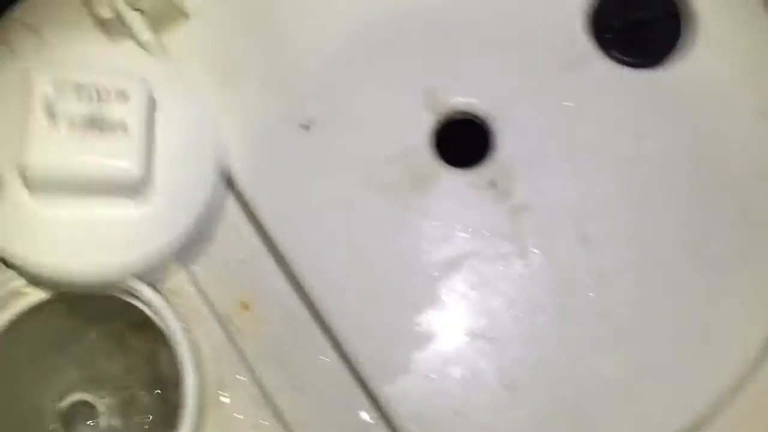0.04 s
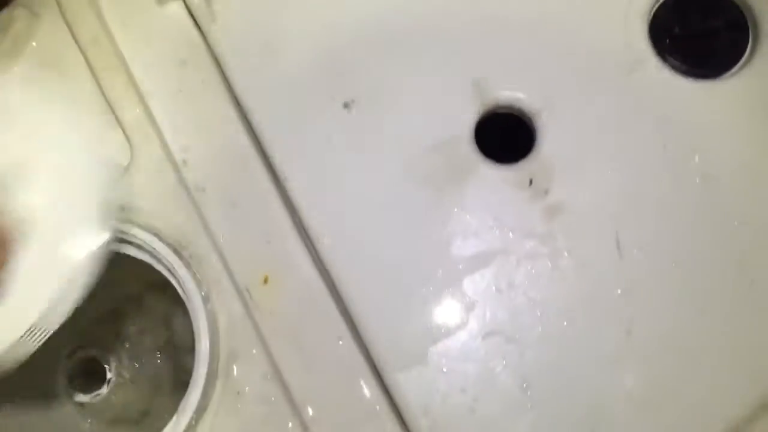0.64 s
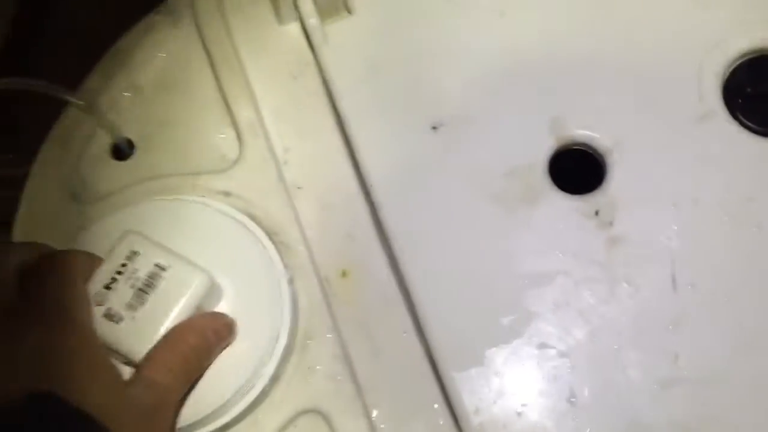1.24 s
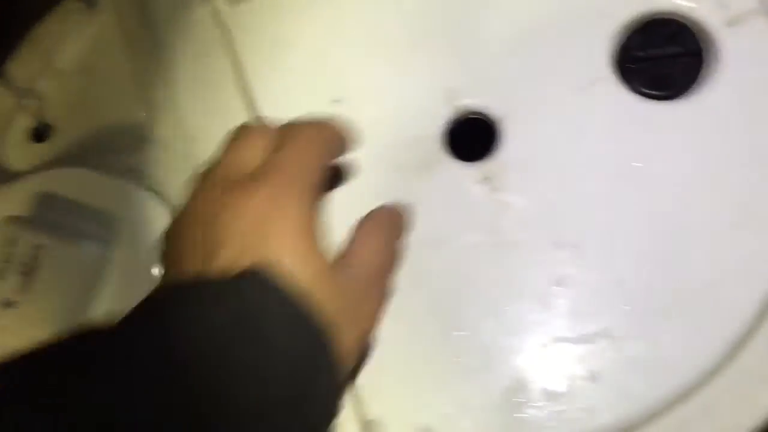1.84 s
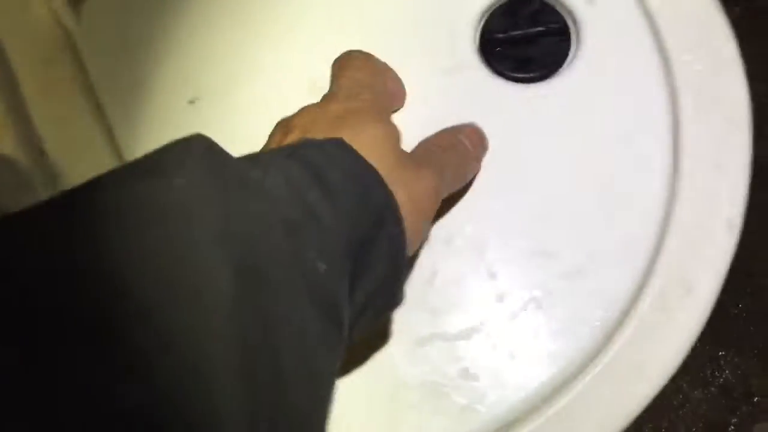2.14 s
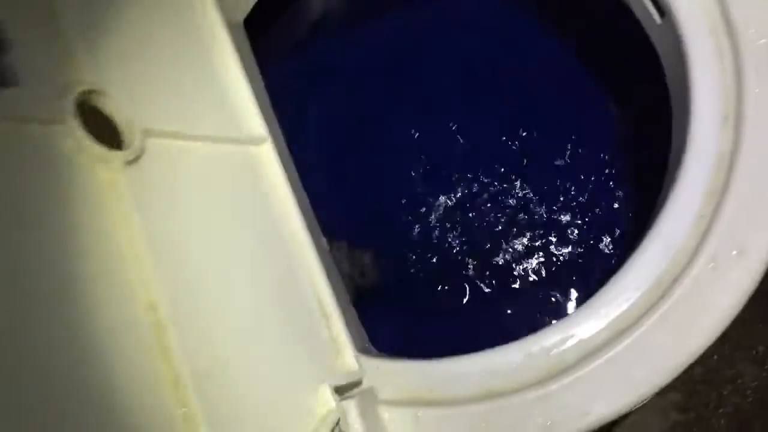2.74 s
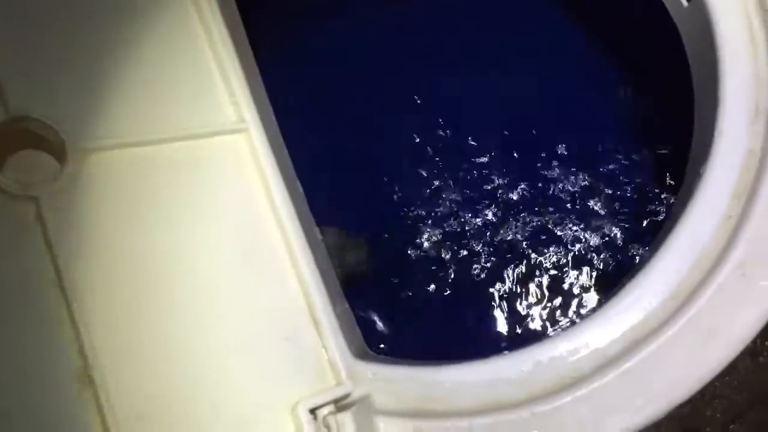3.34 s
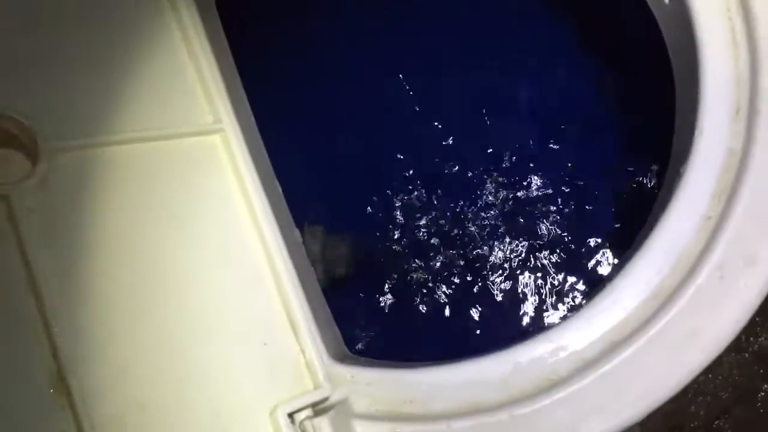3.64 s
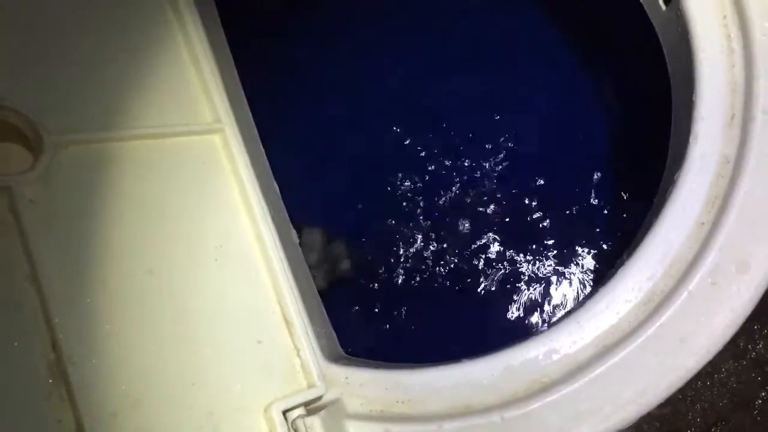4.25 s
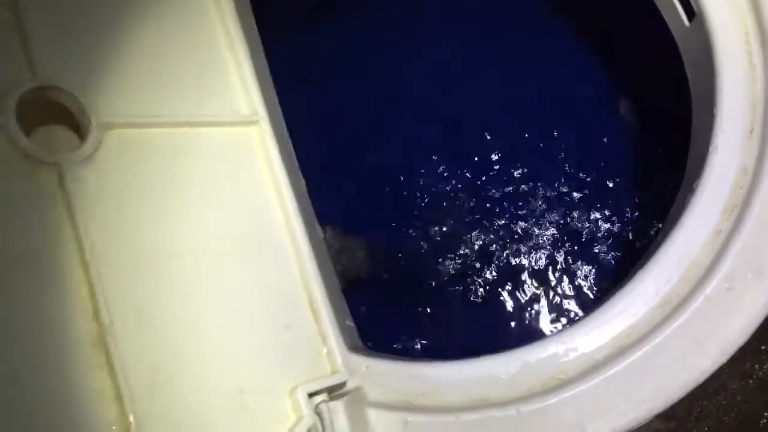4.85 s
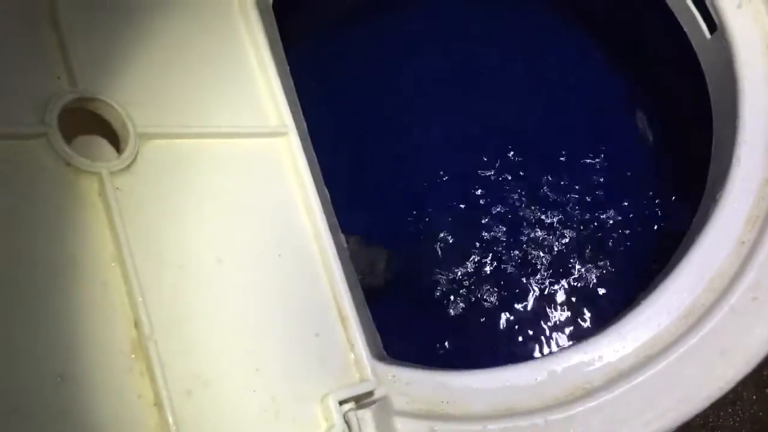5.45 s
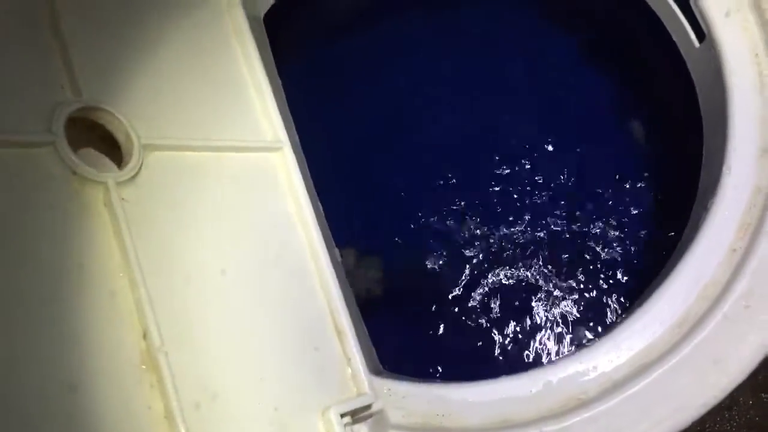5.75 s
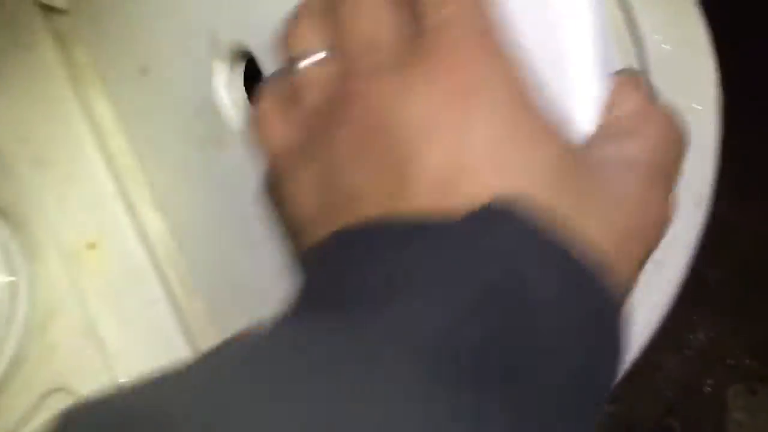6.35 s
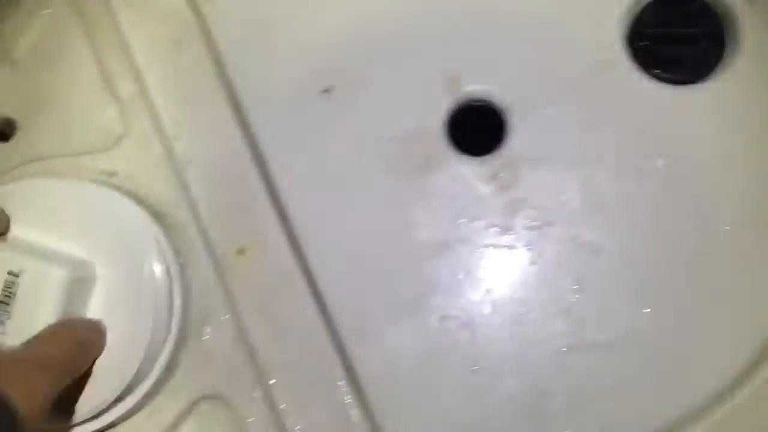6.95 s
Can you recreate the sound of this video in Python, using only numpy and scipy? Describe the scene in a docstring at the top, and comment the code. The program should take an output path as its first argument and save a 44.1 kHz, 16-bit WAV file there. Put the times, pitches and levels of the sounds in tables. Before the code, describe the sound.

Within arm's length of the microphone, water churns softly inside a plastic tank over a faint low hum. A cap is dragged with a chattering scrape, dropped into place and tightened. The lid lifts with hollow thumps and a hinge clack, letting out bubbling, small sloshes and tiny pings, while a sleeve rustles. Finally the plastic lid slams down, the loudest sound, followed by a few light bumps.

```python
"""A plastic bait tank on a deck, one microphone within arm's length. From the start the pump hums and the
inflow churns the water, which booms in the air space under the lid. A hand drags a screw cap over the
deck, drops it in its port at 1 s and screws it down. At 2.3 s the hinged lid is pried up and the water
comes through louder. A jacket sleeve swishes as the arm moves, bubbles gurgle and ping in the open
tank, and at 6.7 s the lid slams."""
import sys
import numpy as np
from scipy import signal
from scipy.fft import rfft, irfft, next_fast_len
from scipy.io import wavfile

SR = 44100
rng = np.random.default_rng(int(sys.argv[2]) if len(sys.argv) > 2 else 0)


def output_pcm(signal):
    """Save a mono or channel-first signal as 16-bit PCM at the path in sys.argv[1].

    Samples are clipped to [-1, 1] before scaling.
    """
    pcm = np.clip(np.atleast_2d(signal).T, -1, 1) * 32767
    wavfile.write(sys.argv[1], SR, np.round(pcm).astype(np.int16))


N = 318093
TIME = np.arange(N) / SR
AGE = TIME[:SR // 2]   # seconds since the onset of a short sound


def from_db(db):
    """Decibels to gain."""
    return np.exp(np.log(10) * np.asarray(db) / 20)


def rms_one(x):
    """Scale to unit rms."""
    return x / np.sqrt(np.mean(x ** 2) + 1e-20)


def colour(x, spectrum):
    """Give a steady sound a spectrum that falls away steeply past its ends; rms 1."""
    hz, db = np.transpose(spectrum)
    freqs = np.maximum(np.fft.rfftfreq(len(x), 1 / SR), 1)
    skirts = np.minimum(1, np.minimum(freqs / hz[0], hz[-1] / freqs)) ** 4
    shape = from_db(np.interp(np.log(freqs), np.log(hz), db))
    return rms_one(irfft(rfft(x) * skirts * shape, len(x)))


def noise(spectrum, size=N):
    """Coloured noise, rms 1."""
    return colour(rng.standard_normal(next_fast_len(size)), spectrum)[:size]


def drift(rate_hz):
    """A random wander about zero, roughly one unit wide."""
    knots = rng.standard_normal(2000)
    return np.interp(TIME * rate_hz, np.arange(len(knots)), knots)


def add(track, s, sound):
    """Mix a sound in at time s."""
    start = max(0, int(s * SR))
    track[start:start + len(sound)] += sound[:N - start]


def fade(t60):
    """Exponential decay, 60 dB down after t60 seconds."""
    return np.exp(-np.log(1000) * np.minimum(AGE / t60, 10))


def swell(s, half_length_s):
    """A smooth rise and fall about time s."""
    return np.exp(-np.minimum(((TIME - s) / half_length_s) ** 2, 20))


def stroke(s, length_s, attack_s, release_s):
    """A rubbing movement swells, holds to the end of its length and dies away."""
    return np.clip((TIME - s) / attack_s, 0, 1) * np.exp(-np.clip(TIME - s - length_s, 0, 1) / release_s)


def ring(modes, spread_db, build_cycles):
    """Struck modes, each with a strength of its own; the low ones take longest to build up."""
    hz, db, t60 = np.transpose(modes)[:, :, None]
    strength = from_db(db + spread_db * rng.standard_normal(hz.shape)) * rng.choice([-1, 1], hz.shape)
    build = 1 - np.exp(-AGE * hz / build_cycles)
    return np.sum(strength * build * fade(t60) * np.sin(2 * np.pi * hz * AGE), axis=0)


def crack(spectrum, t60, tail_db, tail_t60):
    """Countless short modes, with a tail from the hollow of the tank."""
    return noise(spectrum, size=len(AGE)) * (fade(t60) + from_db(tail_db) * fade(tail_t60))


def contact(sound, peaks_db):
    """Place and hardness of a contact decide how high its lows, middles and highs peak."""
    bands = [(700, "low"), ([700, 2200], "band"), (2200, "high")]
    parts = [signal.sosfilt(signal.butter(4, hz, kind, fs=SR, output="sos"), sound) for hz, kind in bands]
    return sum(from_db(db) * part / np.abs(part).max() for db, part in zip(peaks_db, parts))


def bubbles(per_s, low_hz, high_hz, cycles, size_db, rise, size=N):
    """Bubbles ring for some cycles each and rise in pitch as they near the surface."""
    out = np.zeros(next_fast_len(N))
    for when, pitch, strength in rng.random((int(per_s * size / SR), 3)):
        hz = low_hz * (high_hz / low_hz) ** pitch
        life = cycles / hz
        t = AGE[:int(life * SR)]
        chirp = np.sin(2 * np.pi * hz * t * (1 + rise * t / life)) * np.minimum(hz * t / 2, 1)
        gain = from_db(size_db * min(-np.log(1 - strength), 4))
        add(out[:N], when * TIME[size - 1], gain * chirp * np.exp(-np.log(1000) * t / life))
    return rms_one(out)


# tones of the pump: pitch_hz, level_db
PUMP_TONES = [(118.4, -63), (382.2, -53), (759.0, -69), (1141, -67.5)]
# spectrum of pump and pipes: freq_hz, density_db
PIPE_RUMBLE = [(30, -20), (50, -3), (90, 0.5), (130, -6), (170, -10.5)]
def pump():
    """Far down in the background the pump hums, wavering with its load, over a rumble in the pipes."""
    running_s = np.cumsum(1 + .009 * drift(15)) / SR
    hum = sum(from_db(db + 1.5 * drift(21)) * np.sin(2 * np.pi * hz * running_s) for hz, db in PUMP_TONES)
    return hum + from_db(-61) * noise(PIPE_RUMBLE)


# the lid's opening: time_s, open_share
LID_OPENING = [(2.29, 0), (2.52, 1), (6.22, 1), (6.75, 1)]
def lid_open():
    """Rises from 0 to 1 as the lid is lifted and stays there to the end."""
    return np.clip(np.interp(TIME, *np.transpose(LID_OPENING)), 0, 1)


def escaping(shut_db, port_db, lid_db, port_closed_s=1.3):
    """Gain from inside the tank to the microphone; the open port and the lifted lid each add to it."""
    return from_db(shut_db + port_db * (TIME < port_closed_s) + lid_db * lid_open())


# spectra of the churning water and of its fizz: freq_hz, density_db
CHURN_SPECTRUM = [(290, 9.5), (380, 7.5), (480, 1.5), (1000, -13.5), (1350, -14.5), (1900, -18),
                  (3000, -43.5)]
FIZZ_SPECTRUM = [(2200, 1), (3100, -0.5), (4100, -1), (5700, -4.5), (8000, -6.5), (11000, -11),
                 (16000, -12.5)]
AIR_HZ, AIR_T60_S = 231.7, 0.08
def water():
    """The steady inflow stirs up bubbles and fizz, and keeps the air above the water booming."""
    air_mode = fade(AIR_T60_S) * np.cos(2 * np.pi * AIR_HZ * AGE)
    air = signal.fftconvolve(rng.standard_normal(N), air_mode)[:next_fast_len(N)]
    boom = colour(air, [(165, -14.5), (200, 7), (255, -4), (300, -20)])[:N]
    large = bubbles(per_s=520, low_hz=672, high_hz=2315, cycles=51, size_db=4, rise=0.037)
    churn = from_db(-5.5) * colour(large, CHURN_SPECTRUM)[:N]
    churn += from_db(2) * noise(CHURN_SPECTRUM) * from_db(3 * drift(19))
    # under the jet, bubbles come in clusters whose size, and so pitch, wanders
    cloud = bubbles(per_s=170, low_hz=1000, high_hz=1450, cycles=135, size_db=3, rise=0.053)
    position = np.cumsum(np.exp(.055 * drift(9))) % N
    gurgle = np.interp(position, np.arange(len(cloud)), cloud) * from_db(3 * drift(13))
    droplets = bubbles(per_s=170, low_hz=3500, high_hz=7000, cycles=120, size_db=2, rise=.035)[:N]
    droplets *= from_db(2.2 * drift(9))
    # gurgle and droplets reach the microphone through the open hatch
    babble = churn + (0.08 + 0.26 * lid_open()) * gurgle
    spray = from_db(-5.5) * lid_open() * droplets + noise(FIZZ_SPECTRUM) * from_db(drift(26))
    return (escaping(shut_db=-63.5, port_db=3, lid_db=12) * boom
            + escaping(shut_db=-59.5, port_db=3, lid_db=2.5) * babble
            + escaping(shut_db=-68.5, port_db=3.5, lid_db=0.5) * spray)


# waves slopping at the tank wall: middle_s, half_length_s, level_db, centre_hz
WAVES = [(3.758, 0.038, -62, 1790), (5.264, 0.13, -62, 1820), (5.486, 0.041, -61.5, 2060),
         (6.129, 0.022, -55.5, 1990)]
def sloshes():
    """Each small wave swells and falls with a burst of froth."""
    waves = sum(from_db(db) * swell(s, half) * noise([(hz / 2, -12), (hz, 0), (hz * 2, -15)])
                for s, half, db, hz in WAVES)
    return waves * from_db(2.9 * drift(70))


# clusters of large bubbles: middle_s, level_db, pitch_hz
CLUSTERS = [(3.745, -53.5, 1226), (3.83, -56.5, 1323), (4.3, -58, 860), (4.546, -55.5, 1316),
            (4.809, -60.5, 1500), (5.159, -58.5, 1200), (5.459, -60, 1330), (5.72, -59.5, 1237),
            (5.962, -61, 1470), (6.19, -52.5, 1200)]
def gurgles(half_length_s=0.052, pitch_ratio=0.99):
    """A cluster of like-sized bubbles swells up and dies away."""
    out = np.zeros(N)
    envelope = np.exp(-((AGE - AGE.mean()) / half_length_s) ** 2)
    for s, db, hz in CLUSTERS:
        cloud = bubbles(per_s=120, low_hz=hz * pitch_ratio, high_hz=hz / pitch_ratio,
                        cycles=144, size_db=4, rise=0.09, size=len(AGE))
        cluster = rms_one(envelope * cloud[:len(AGE)]) / rms_one(envelope).max()
        add(out, s - AGE.mean(), from_db(db) * cluster)
    return out


# the loudest tiny bubbles: start_s, level_db, pitch_hz
BURSTS = [(1.142, -45, 9640), (2.771, -46, 9200), (3.73, -49.5, 9900), (3.7476, -47, 5270),
          (4.194, -43, 11300), (4.4767, -51.5, 3970), (4.785, -52, 13800), (4.93, -52, 5350),
          (5.3354, -47.5, 9130), (6.166, -41, 12000)]
def pings(ring_cycles=180):
    """Single tiny bubbles burst and ring; the smaller, the higher and shorter."""
    out = np.zeros(N)
    for s, db, hz in BURSTS:
        note = np.sin(2 * np.pi * hz * AGE * (1 + 0.6 * AGE)) * fade(ring_cycles / hz)
        spatter = crack([(hz * 1.35, -6), (hz, 0), (hz * 0.91, -6)], 0.015, tail_db=-11, tail_t60=0.12)
        add(out, s, from_db(db) * (note + 0.45 * spatter) * (1 - fade(0.0016)))
    return out


# arm movements: middle_s, half_length_s, swish_db, sheen_db
ARM_MOVES = [(1.6, 0.075, -54, -62.5), (2.613, 0.14, -55, -67), (2.97, 0.15, -59, -66.5),
             (3.174, 0.087, -53, -53), (3.299, 0.029, -56, -56), (3.416, 0.13, -52.5, -55),
             (5.012, 0.075, -60.5, -67.5), (6.357, .14, -53, -61)]
# the sleeve pressing along the jacket: start_s, length_s, level_db
SLEEVE_PRESSES = [(3.267, 0.032, -34), (3.402, 0.11, -47.5)]
# spectra of the sleeve's swish, its sheen, pressed cloth and skin on plastic: freq_hz, density_db
SWISH_SPECTRUM = [(500, 6.5), (1350, 4.5), (2050, 0.5), (2900, -1.5), (3850, -0.5), (4900, -4), (7200, -5),
                  (9000, -38)]
SHEEN_SPECTRUM = [(7800, -4), (9150, 4), (10300, -7), (11000, -1.5), (15500, -6.5)]
CLOTH_SPECTRUM = [(50, -12), (120, -4.5), (350, 2), (490, -5), (690, 4.5), (850, -10.5), (1300, -18.5),
                  (2100, -21.5)]
SKIN_SPECTRUM = [(900, -22), (1500, 8.5), (2600, 2), (4400, 2), (5000, -9), (6000, -4), (9500, -16),
                 (15000, -30)]
def arm(gap_hz=1990, gap_share=0.22):
    """Close to the microphone, fabric swishes in grainy swells and the hand slides off the cap."""
    swish, sheen = sum(from_db([[swish_db], [sheen_db]]) * swell(s, half)
                       for s, half, swish_db, sheen_db in ARM_MOVES)
    press = sum(from_db(db) * stroke(s, length, attack_s=0.018, release_s=0.11)
                for s, length, db in SLEEVE_PRESSES)
    slide = from_db(-41) * stroke(1.664, length_s=0.11, attack_s=0.087, release_s=0.048)
    hiss = swish * noise(SWISH_SPECTRUM) + sheen * noise(SHEEN_SPECTRUM)
    hiss += press * noise(CLOTH_SPECTRUM) * from_db(2 * drift(60))
    # a narrow gap under the arm rings at multiples of gap_hz
    hollow = sum(gap_share ** k * np.interp(TIME - k / gap_hz, TIME, hiss) for k in range(3))
    rub = hollow * from_db(2 * drift(45) + 0.78 * drift(250)) + slide * noise(SKIN_SPECTRUM)
    deck_reflection = .25 * np.interp(TIME - .00087, TIME, rub)
    return rub + deck_reflection


# modes of the deck: pitch_hz, level_db, t60_s
DECK_MODES = [(143, -1.5, .085), (219.5, 5, 0.074), (362, -2.5, 0.1), (548, -4.5, 0.068), (996, 4.5, 0.044),
              (1130, 4, 0.033), (1376, -8.5, 0.019), (1760, -18.5, 0.068), (2464, -16, 0.065),
              (2690, -14.5, 0.036)]
def deck_modes(wander=0.021):
    """The deck's pitches shift a little with the place of contact."""
    return [(hz * np.exp(wander * rng.standard_normal()), db, t60) for hz, db, t60 in DECK_MODES]


# crack of the deck's plastic: freq_hz, density_db
DECK_SPECTRUM = [(100, 12), (1100, 0), (2600, -12), (3600, -20.5), (5600, -21.5), (10000, -35.5),
                 (16000, -93)]
# soft blows on the tank: start_s, pitch_hz, t60_s, boom_db, scuff_db
NUDGES = [(1.098, 319, 0.082, -28, -33), (1.188, 220, 0.043, -25.5, -51), (1.25, 304, .09, -35, -40),
          (1.382, 283, 0.051, -25, -37), (1.583, 215, 0.07, -31, -42.5), (2.381, 233, 0.08, -21, -41),
          (2.442, 227, 0.13, -26, -53), (2.498, 242.4, .15, -25, -45.5), (2.561, 245, 0.12, -31.5, -61),
          (2.672, 239, 0.081, -25.5, -35), (2.811, 250, 0.11, -35, -52), (4.112, 232, 0.078, -28.5, -52),
          (6.357, 238, 0.059, -24.5, -70), (6.464, 242, 0.093, -21, -43), (6.509, 223, 0.079, -14, -34),
          (6.686, 212, .12, -23, -53), (6.976, 212, 0.046, -26, -48), (7.029, 296, 0.099, -36, -50),
          (7.117, 193, 0.054, -37.5, -46)]
def bumps(rattle_share=0.083):
    """Fingers, cap and lid nudge the tank: a rough boom, pitched by place and opening, and a scuff."""
    out = np.zeros(N)
    for s, hz, t60, boom_db, scuff_db in NUDGES:
        modes = [(hz, 0, t60), (hz * .62, -15, .06), (hz * 1.35, -11, .05)]
        boom = ring(modes, spread_db=0.96, build_cycles=3) * (1 - np.exp(-AGE / 0.0035))
        scuff = crack(DECK_SPECTRUM, t60=.035, tail_db=-14, tail_t60=.14)
        scuff += .3 * ring(deck_modes()[3:], spread_db=2, build_cycles=1)
        blow = boom + rattle_share * scuff * (1 - fade(.02))
        add(out, s, contact(blow, [boom_db, scuff_db, scuff_db - 20]))
    return out


# pushes that drag the cap: start_s, length_s, level_db
CAP_PUSHES = [(0.012, 0.12, -35.5), (0.133, 0.063, -24), (0.188, 0.082, -39), (0.302, 0.1, -30.5),
              (0.553, 0.027, -37)]
# its rim catching on the deck: start_s, low_db, middle_db, high_db
RIM_CATCHES = [(.022, -26, -30, -50), (.038, -22.5, -19.5, -45), (.059, -20, -29, -47),
               (.111, -26.5, -32, -35.5), (.13, -6, -10.5, -14), (.151, -10, -17, -15.5),
               (.17, -14.5, -5.5, -19.5), (0.212, -24, -14.5, -48), (.226, -25, -18.5, -46),
               (.242, -22, -17.5, -33), (.293, -18.5, -15, -15), (.326, -20, -13.5, -38),
               (.353, -19.5, -16.5, -19), (.389, -17.5, -25, -43), (.502, -30.5, -34.5, -49),
               (.523, -29.5, -22.5, -58), (.57, -22.5, -22, -54)]
def cap_drag(slips_per_s=420, slip_spread_db=2, spots=4):
    """The cap chatters over the deck in small slips and catches now and then with a short tick."""
    chatter = np.zeros(N)
    for _ in range(spots):
        slipping = rng.random(SR) < slips_per_s / spots / SR
        slips = slipping * from_db(slip_spread_db * rng.standard_normal(SR)) * rng.choice([-1, 1], SR)
        tick = ring(deck_modes(), spread_db=2, build_cycles=.3)
        tick += .25 * crack(DECK_SPECTRUM, t60=.012, tail_db=-14, tail_t60=.08)
        add(chatter, 0, signal.fftconvolve(slips, tick))
    effort = sum(from_db(db) * stroke(s, length, attack_s=0.012, release_s=0.027)
                 for s, length, db in CAP_PUSHES)
    out = effort * chatter / chatter[:SR].std()
    for s, *peaks_db in RIM_CATCHES:
        knock = ring(deck_modes(), spread_db=3.3, build_cycles=0.23)
        snap = crack(DECK_SPECTRUM, t60=0.017, tail_db=-9.5, tail_t60=0.16)
        add(out, s, contact(knock + 1.4 * snap, peaks_db))
    # the drag keeps out of the deep bass and the top treble
    return signal.sosfilt(signal.butter(2, [90, 10000], "band", fs=SR, output="sos"), out + 1e-18)


# modes of the cap: pitch_hz, level_db, t60_s
CAP_MODES = [(344, 1, 0.13), (385, 8, 0.19), (448, 3, 0.14), (1253, 9.5, 0.09), (1430, 8.5, 0.039),
             (1660, 4, 0.069), (2400, -2.5, 0.12), (2650, -10, 0.14), (2840, -5, 0.055), (4660, 3.5, 0.012)]
# crack of the cap's plastic: freq_hz, density_db
CAP_SPECTRUM = [(150, -19), (350, 13.5), (800, -6), (1400, 4.5), (2700, -7), (3600, -6.5), (4800, -10),
                (7500, -17.5), (16000, -30)]
# the cap landing in its port: start_s, low_db, middle_db, high_db
CAP_BOUNCES = [(1.023, -19, -10, -10.5), (1.029, -24, -33, -18), (1.056, -22, -25.5, -40)]
def cap_taps():
    """The cap clacks into its port and bounces, damped by the hand that holds it."""
    out = np.zeros(N)
    for s, *peaks_db in CAP_BOUNCES:
        snap = crack(CAP_SPECTRUM, t60=0.025, tail_db=-14.5, tail_t60=0.28)
        body = ring(CAP_MODES, spread_db=0.69, build_cycles=0.42) * fade(t60=0.37)
        add(out, s, contact(body + 1.35 * snap, peaks_db))
    return out


def cap_turn(port_hz=305):
    """Screwed down, the cap rubs unevenly on its seat and its thread grates once."""
    seat = noise([(port_hz * 0.45, -8), (port_hz, 0), (port_hz * 1.08, -7),
                  (port_hz * 2, -23), (port_hz * 6, -35)])
    turn = from_db(-47.5 + 5.1 * drift(28.98)) * stroke(1.023, 0.6, attack_s=.03, release_s=0.026)
    grate = from_db(-37.5) * stroke(1.461, length_s=0.0059, attack_s=0.0048, release_s=0.013)
    return turn * seat + grate * noise(CAP_SPECTRUM)


# clicks of the cap's thread: start_s, level_db
CLICKS = [(.502, -32.5), (1.188, -50.5), (1.384, -57)]
# their spectrum: freq_hz, density_db
THREAD_SPECTRUM = [(4450, 2.5), (5200, -1.5), (9000, -9.5), (13000, -30)]
def thread_clicks():
    """The cap's thin thread gives small, bright, dry clicks."""
    out = np.zeros(N)
    for s, db in CLICKS:
        add(out, s, from_db(db) * crack(THREAD_SPECTRUM, t60=0.015, tail_db=-20, tail_t60=0.17))
    return out


# jerks of the lid: start_s, low_db, high_db
LID_JERKS = [(2.268, -22, -56), (2.296, -26, -37.5), (2.327, -26.5, -55), (2.343, -32, -54)]
def lid_pry():
    """The lid's edge rubs and jerks out of its seat."""
    pull = from_db(-43.5) * stroke(2.26, length_s=0.11, attack_s=0.038, release_s=0.068)
    out = pull * noise(DECK_SPECTRUM) * from_db(2 * drift(150))
    for s, low_db, high_db in LID_JERKS:
        thud = ring(DECK_MODES[:2], spread_db=1.2, build_cycles=0.39)
        snap = crack(DECK_SPECTRUM, t60=0.031, tail_db=-9, tail_t60=0.071) * (1 - fade(0.0065))
        add(out, s, contact(thud + 0.39 * snap, [low_db, low_db - 15.5, high_db]))
    return out


# modes of the hinge: pitch_hz, level_db, t60_s
HINGE_MODES = [(694, -1, 0.043), (932, -4, 0.14), (1070, 0.5, 0.056), (1387, 8, 0.027), (1965, -12, 0.076),
               (3820, -3, 0.033)]
# knocks of hinge and stop: start_s, low_db, middle_db, high_db
HINGE_KNOCKS = [(2.653, -38, -23.5, -33.5), (2.664, -32, -30.5, -51)]
def hinge():
    """The hinge clacks, then the lid lands on its stop."""
    out = np.zeros(N)
    for s, *peaks_db in HINGE_KNOCKS:
        body = ring(HINGE_MODES, spread_db=0.91, build_cycles=0.95)
        snap = crack(CAP_SPECTRUM, t60=0.053, tail_db=-13, tail_t60=0.15)
        add(out, s, contact(body + 1.05 * snap, peaks_db))
    return out


def lid_settle(open_tank_hz=243):
    """Just after landing on its stop, the lid shudders and the tank's air booms briefly."""
    boom = noise([(open_tank_hz * 0.73, -12), (open_tank_hz, 0), (open_tank_hz * 1.6, -12)])
    return from_db(-39) * stroke(2.7, length_s=0.084, attack_s=0.018, release_s=0.026) * boom


# modes of the lid: pitch_hz, level_db, t60_s
LID_MODES = [(74, 3, .07), (130, 11.5, 0.091), (210, 1.5, .19), (368, -2, 0.12), (684, 1, 0.12),
             (968, -9, 0.1), (1164, -11, 0.11), (1930, -9, .08), (2480, -14, 0.098), (2680, -16, .09),
             (3730, -20, .08)]
# crack of the lid's plastic: freq_hz, density_db
LID_SPECTRUM = [(100, 16.5), (480, 4.5), (900, -0.5), (2600, -10), (4500, -18.5), (7500, -18.5),
                (10000, -29.5), (16000, -44)]
# blows of the falling lid: start_s, low_db, middle_db, high_db
LID_BLOWS = [(6.726, -14, -23, -22.5), (6.748, -2, -5.5, -4)]
def lid_slam():
    """The lid clips the rim and slams, the loudest thing at the microphone."""
    out = np.zeros(N)
    for s, *peaks_db in LID_BLOWS:
        snap = crack(LID_SPECTRUM, t60=0.077, tail_db=-13.5, tail_t60=0.24) * (1 - fade(0.004))
        body = ring(LID_MODES, spread_db=0.74, build_cycles=2)
        add(out, s, contact(body + 1.86 * snap, peaks_db))
    return out


def scene():
    """One mono microphone, with everything within arm's length of it."""
    background = water() + gurgles() + sloshes() + pings() + pump() + arm()
    cap = cap_drag() + cap_taps() + cap_turn() + thread_clicks()
    lid = lid_pry() + hinge() + lid_slam() + lid_settle()
    return (background + cap + lid + bumps())[None]


def record(dry):
    """Behind the microphone: a 45 Hz low cut, softly rounded peaks and a steep cut at 16 kHz."""
    thin = signal.sosfilt(signal.butter(2, 45, "high", fs=SR, output="sos"), dry)
    rounded = .85 * np.tanh(thin / .85)
    return signal.sosfilt(signal.ellip(10, .1, 80, 16000, fs=SR, output="sos"), rounded)


dry = scene()
out = record(dry)
output_pcm(out)
```